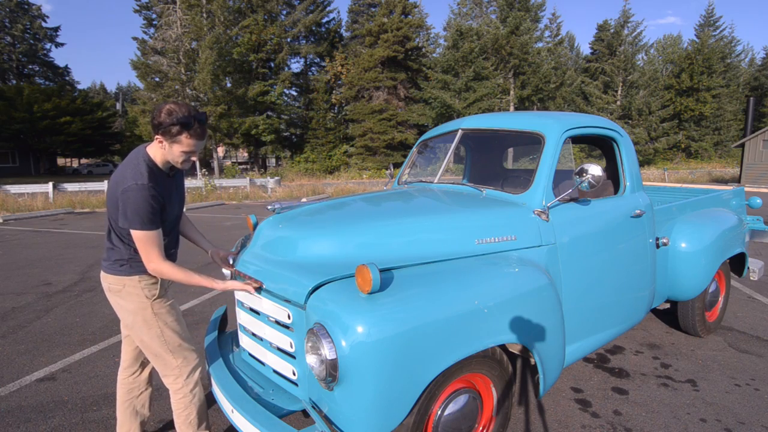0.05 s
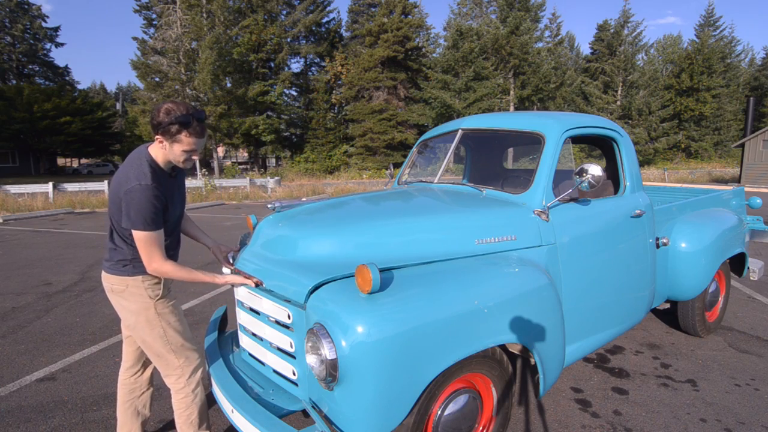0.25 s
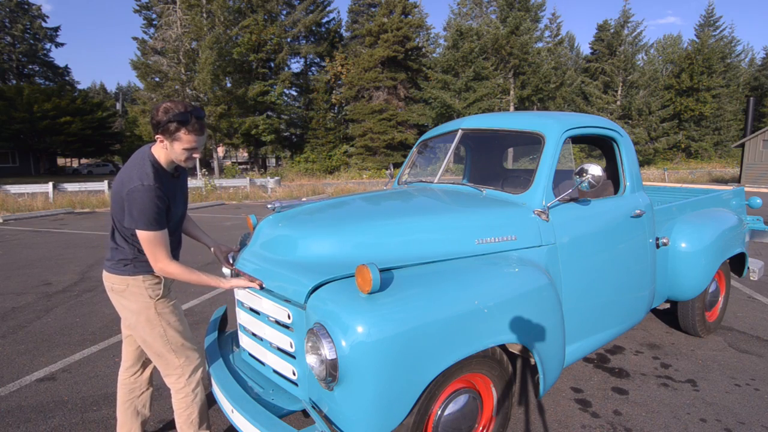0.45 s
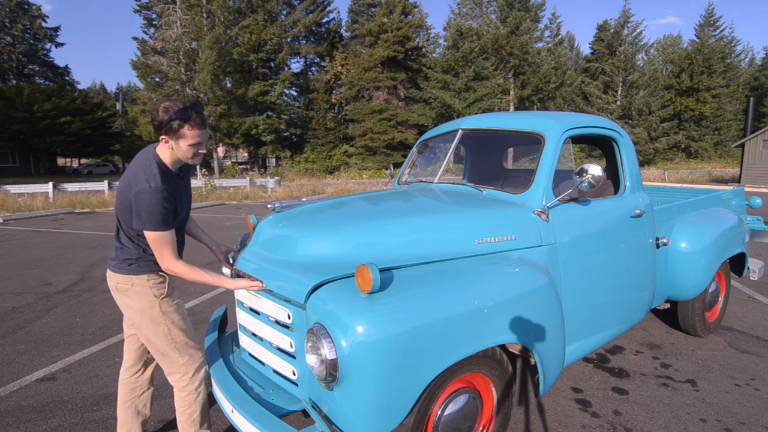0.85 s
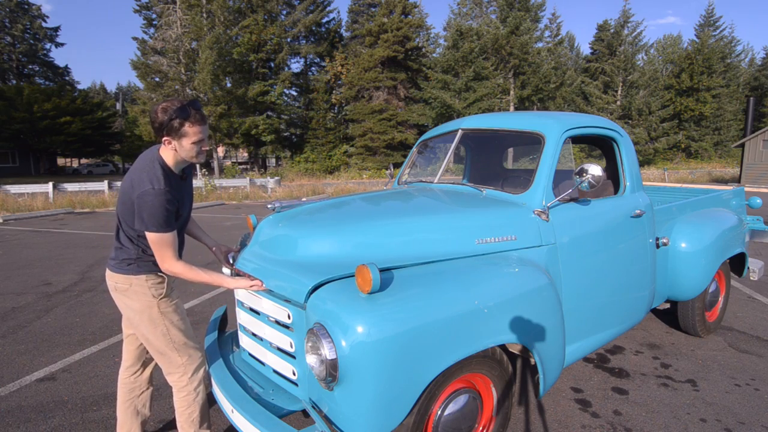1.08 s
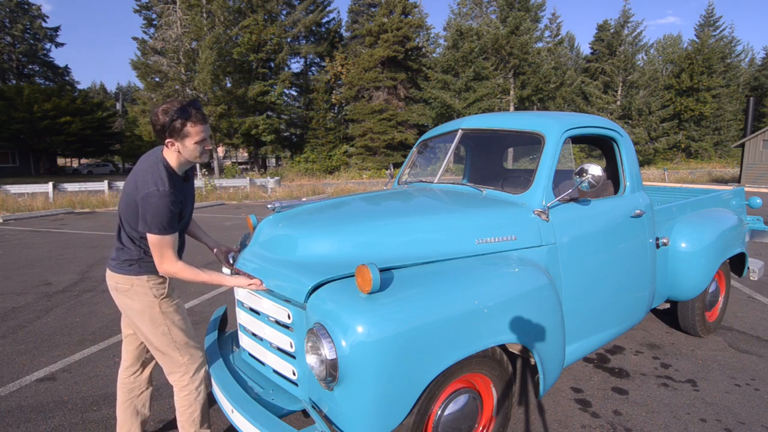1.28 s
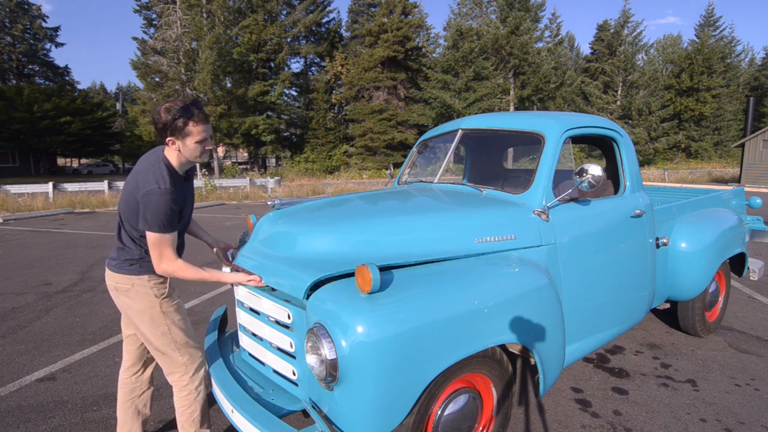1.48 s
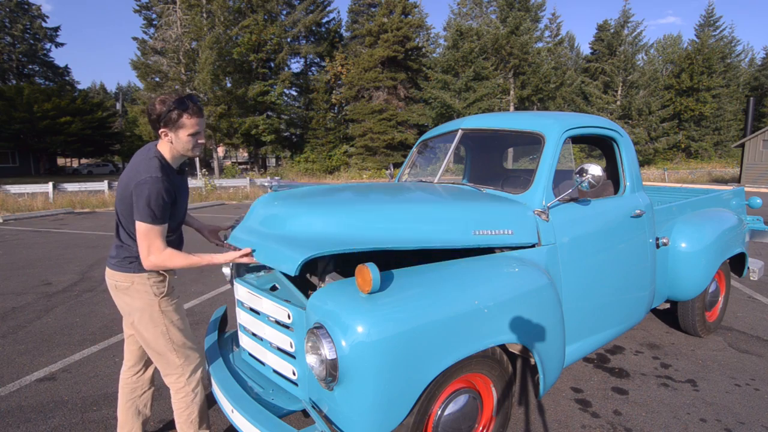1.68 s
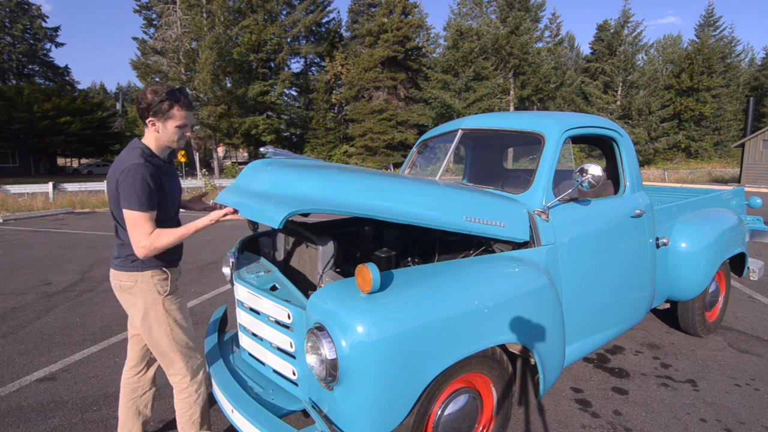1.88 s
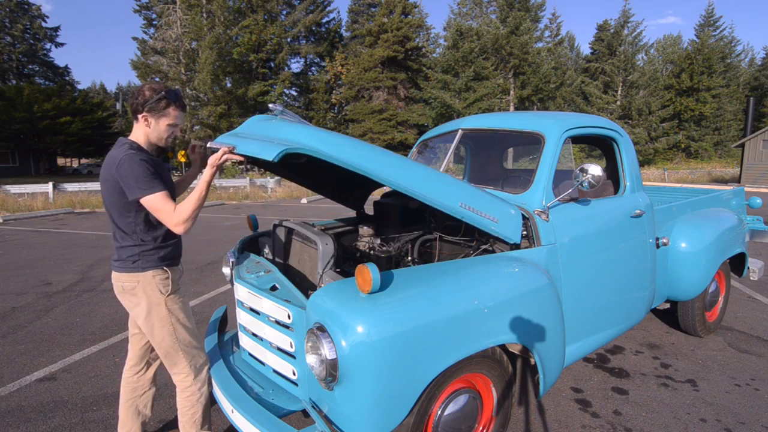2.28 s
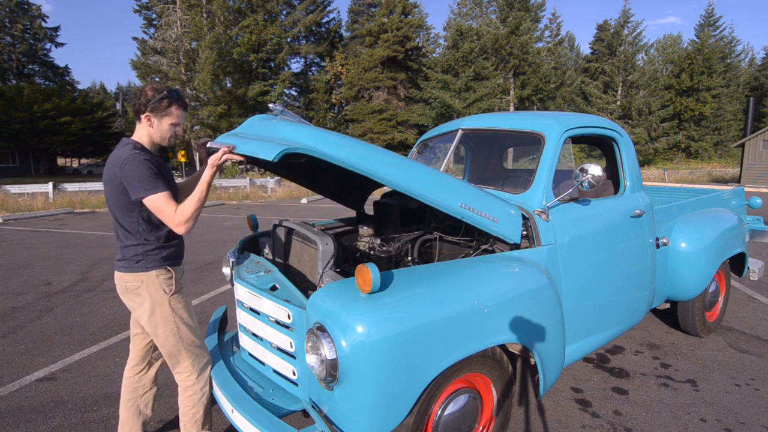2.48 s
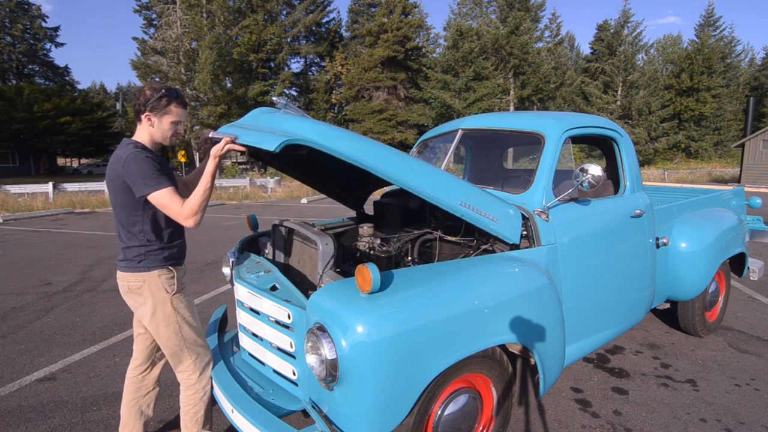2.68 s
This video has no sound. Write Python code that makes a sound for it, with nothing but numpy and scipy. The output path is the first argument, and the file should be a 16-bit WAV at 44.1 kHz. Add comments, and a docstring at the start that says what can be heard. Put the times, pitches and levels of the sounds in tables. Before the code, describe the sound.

A metal truck hood pops with a clunk and a hollow boom. Its catch clicks, scrapes and slips loose, and the springs clank as it lifts, ending on a squeak. Heard up close over faint outdoor rumble and sleeve rustle.

```python
"""The steel hood of an old pickup is opened by hand in a quiet parking lot.
The latch lets go with a clunk and the freed panel booms. The safety catch snaps, squeaks and slips
free, then the hinge springs clank as the hood rises. Each hit layers a crack, the part's own ring
and the wash of the panels; rubbing metal scrapes and sings. Sleeves rustle over a low outdoor rumble."""
import sys
import numpy as np
from scipy import signal
from scipy.fft import rfft, irfft, next_fast_len
from scipy.io import wavfile
from scipy.ndimage import uniform_filter1d

SR = 44100
rng = np.random.default_rng(int(sys.argv[2]) if len(sys.argv) > 2 else 0)


def unload_audio(sound):
    """Save the sound as a 16-bit wav file, at the path given as the first command line argument."""
    columns = np.transpose(np.atleast_2d(sound))
    # keep every value between -1 and 1, then stretch to whole-number steps
    steps = np.round(np.clip(columns, -1, 1) * 32767)
    wavfile.write(sys.argv[1], SR, steps.astype(np.int16))


N = 125685
T = np.arange(N) / SR
BAND_HZ = 25 * 2 ** (np.arange(29) / 3)
COLOUR_HZ = (200, 750, 2200, 8000)  # bass, mids, presence and treble of a hit
TOP_HZ, CUTOFF_HZ = 14000, 16000
CRACK_DB, CRACK_T60_S = 5, 0.041
BUILD_CYCLES = 2.24  # a panel needs a few cycles to get going, so the lows come later

# Outdoor rumble bed: f/Hz, band level/dB
AIR_SPECTRUM = [(38, -56.5), (62, -49.5), (85, -73.5), (125, -59.5), (160, -66), (230, -60.5), (500, -63.5),
                (900, -62), (1600, -73.5), (3200, -83), (8000, -83)]
# Tone of the cloth: f/Hz, band level/dB
CLOTH_SPECTRUM = [(3000, 1), (5500, 7.5), (10000, 4.5), (15000, -1.5)]
# Sleeve moves: t/s, length/s, level/dB
RUSTLES = [(.105, 0.084, -55.5), (.40, 0.21, -60), (.52, 0.18, -54), (1.40, 0.25, -59), (1.66, 0.49, -63.5)]
# Metal rubbing on metal: t/s, length/s, drive level/dB
SCRAPES = [(.645, 0.083, -52.5), (1.48, 0.11, -43), (1.80, 0.39, -54), (2.765, 0.11, -44)]
# Resonances the rubbing drives: f/Hz, width/Hz, gain/dB
SCRAPE_RINGS = [(615, 290, -16), (995, 300, -9.5), (2000, 200, -27.5)]
# Squeaks of catch and pivots: t/s, length/s, f/Hz, level/dB
SQUEAKS = [(1.499, 0.032, 1120, -40.5), (1.512, .036, 1020, -38), (1.501, 0.065, 2740, -50),
           (1.918, 0.029, 2700, -54), (2.814, 0.093, 890, -39)]
# Low thumps of the flexing hood: t/s, f/Hz, level/dB, rise/s, t60/s
FLEXES = [(.264, 121, -24, 0.0084, 0.1), (.286, 192, -19, 0.0066, .021), (0.25, 54, -34, 0.03, 0.61),
          (0.3, 100, -27.5, 0.027, .2), (.335, 68, -31.5, 0.028, 0.28)]

# Hits on each part: t/s, then level/dB at each of COLOUR_HZ
HINGE_TAPS = [(2.4267, -55.5, -40, -45, -55.5)]
SPRING_CLANKS = [(2.2522, -60, -39.5, -34.5, -47.5), (2.4934, -34.5, -29.5, -24, -35)]
RELEASE_CLUNKS = [(0.183, -43, -39.5, -47, -45), (.239, -35.5, -37, -37.5, -52),
                  (.263, -28.5, -31, -60, -39.5), (.270, -36, -28, -35, -39.5),
                  (.287, -32, -30, -34.5, -34), (.422, -46.5, -45, -53.5, -62)]
CATCH_SNAPS = [(1.2801, -40, -33, -30, -50.5)]
CATCH_SLIPS = [(1.605, -37.5, -29, -45.5, -51.5), (1.617, -34.5, -35.5, -42.5, -54.5)]
PIN_TICKS = [(1.025, -70, -47.5, -52.5, -66.5), (1.065, -42.5, -44, -53.5, -58.5),
             (1.6582, -55, -45.5, -43.5, -39.5)]
HOOD_KNOCKS = [(1.826, -40, -38, -48, -53.5), (1.856, -53, -46, -54, -55.5), (1.907, -37, -36, -52, -65),
               (2.027, -70, -59, -57.5, -61), (2.6742, -37, -66, -93, -53.5)]

# Ring of each part: f/Hz, level/dB relative to the hit
HINGE_MODES = [(545, 8.5), (915, 6.5), (2120, -1)]
SPRING_MODES = [(468, -6.5), (899, -11), (1302, -7.5), (1653, -9.5), (1782, -5), (2444, -10), (4947, -13),
                (6718, -2)]
HOOD_MODES = [(191, -10), (220, -9.5), (289, -13.5), (345, -18), (428, -9.5), (620, -16), (683, -30),
              (1018, -17)]
CATCH_MODES = [(818, -2.5), (1130, -1.5), (1432, -6.5), (1610, -4.5), (2186, -7.5), (2369, -14), (3020, -8)]
STRIKER_MODES = [(218, 0), (345, -17), (813, 3.5), (1035, -2.5)]
PIN_MODES = [(3780, 1.4), (5330, 3.5), (7600, 4.1), (11370, 1.47)]
HOOD_EDGE_MODES = [(340, -5.5), (392, -2), (560, -6)]

# Wash of many weak panel modes: f/Hz, band level/dB relative to the hit
PANEL_SPECTRUM = [(110, -16.5), (150, -10.5), (220, -9.5), (500, -6), (1000, -7), (2300, -8), (3400, -11),
                  (5000, -5), (8000, -7.5), (11000, -11.5), (15000, -26)]
# Decay of the wash, before each part's ring_scale: f/Hz, t60/s
PANEL_T60 = [(100, 0.16), (300, 0.3), (800, 0.29), (2200, 0.26), (6000, 0.083), (14000, 0.078)]
# Faint tail behind a hit: f/Hz, t60/s
TAIL_T60 = [(150, 2.8), (700, 1.17), (2000, 0.37), (5000, 0.1), (12000, 0.21)]
# Stereo image, tight lows and wide highs: f/Hz, left-right correlation
CORRELATION = [(30, 0.95), (110, 1), (800, 0.98), (2200, .82), (4000, 0.04), (10000, 0.19)]
# Stereo lean: f/Hz, left minus right level/dB
BALANCE = [(1000, 0), (2500, -1), (4500, -4), (8000, -0.5), (13000, 2.5)]


def from_db(db):
    """Decibels to gain."""
    return 10 ** (np.asarray(db) / 20)


def at_hz(points, hz):
    """Read a curve on a log-frequency axis."""
    freqs, values = np.transpose(points)
    return np.interp(np.log(hz), np.log(freqs), values)


def pan(hz):
    """Left and right gains at a frequency."""
    return from_db(at_hz(BALANCE, hz) * np.array([[.5], [-.5]]))


def decay(t, t60):
    """Exponential fade, 60 dB down at t60."""
    return np.exp(-np.log(1000) * t / max(t60, 1e-3))


def swells(rows):
    """A rounded envelope for each stroke."""
    return sum(from_db(db) * np.sin(np.pi * np.clip((T - start) / length, 0, 1)) ** 2
               for start, length, db in rows)


def noise_bands(ripple_db, mode_spacing_hz=35.42):
    """Steady third-octave bands of stereo noise; ripple favours some pitches, as steel does."""
    size, bands = next_fast_len(N + SR // 2), []
    freqs = np.arange(size // 2 + 1) * SR / size
    knots = np.arange(SR // 20) * mode_spacing_hz
    peaks = np.clip(rng.standard_normal(len(knots)), -2, 2)
    ripple = ripple_db * np.interp(freqs, knots, peaks) * freqs / (freqs + COLOUR_HZ[1])
    noise = irfft(rfft(rng.standard_normal((2, 2, size))) * from_db(ripple), size)
    for k, hz in enumerate(BAND_HZ):
        bandpass = signal.butter(2, [hz / 1.13, hz * 1.13], "band", fs=SR, output="sos")
        pair = signal.sosfilt(bandpass, noise[k % 2])[:, -N:]
        power = uniform_filter1d(pair ** 2, size=int(SR * max(9 / hz, .012)))
        mid, side = pair / np.sqrt(power + 1e-18)
        alike = np.clip(at_hz(CORRELATION, hz), 0, .999)
        stereo = np.sqrt((1 + alike) / 2) * mid + np.sqrt((1 - alike) / 2) * side * [[1], [-1]]
        bands.append(pan(hz) * stereo)
    return np.array(bands)


def coloured(bands, spectrum):
    """Mix the bands through an EQ curve."""
    return np.tensordot(from_db(at_hz(spectrum, BAND_HZ)), bands, 1)


def outdoor_rumble(bands):
    """Open air lays a steady, bass-heavy bed."""
    return coloured(bands, AIR_SPECTRUM)


def sleeves(bands):
    """Moving cloth brushes out soft swells of hiss."""
    cloth = coloured(bands, CLOTH_SPECTRUM)
    return swells(RUSTLES) * cloth / cloth.std()


def scrapes(bands, slips_per_s=710, slip_t60=0.016):
    """Dry metal slips in tiny uneven jerks, a grit that rings a few resonances."""
    slips = (rng.random(N) < slips_per_s / SR) * rng.random(N)
    grain = np.sqrt(signal.lfilter([1], [1, -decay(2 / SR, slip_t60)], slips + 1e-18))
    hiss = bands[BAND_HZ > COLOUR_HZ[0]].sum(0)
    friction = hiss * grain / grain.std() * swells(SCRAPES) + 1e-18
    return sum(from_db(db) * signal.lfilter(*signal.iirpeak(hz, hz / width, fs=SR), friction)
               for hz, width, db in SCRAPE_RINGS)


def squeaks(jitter_hz_at_1k=84.9):
    """Sticking metal sings briefly on one mode, unsteady in pitch."""
    out, knots = 0, np.arange(0, T[-1], .003)
    for start, length, hz, db in SQUEAKS:
        wobble = np.interp(T, knots, rng.standard_normal(len(knots)))
        pitch = hz + jitter_hz_at_1k * np.sqrt(hz / 1000) * wobble
        out = out + pan(hz) * swells([(start, length, db)]) * np.sin(2 * np.pi * np.cumsum(pitch) / SR)
    return out


def waver(t, depth_hz=4.26):
    """Flexing steel bends a mode a little: a slow random phase drift, in cycles."""
    return np.cumsum(depth_hz * np.interp(t * 20, np.arange(32), rng.standard_normal(32))) / SR


def struck(bands, hits, modes, t60_at_1k, ring_scale, tail_db, rise_s, top_db):
    """Struck steel: crack, panel wash, tail and the part's modes; top_db tilts treble to TOP_HZ."""
    out = np.zeros((2, N))
    t = T[:SR * 3 // 2]

    def attack(hz):
        """Rise of the ring, slower for low pitches."""
        return np.minimum(t / (rise_s + min(BUILD_CYCLES / hz, .012)), 1)

    crack = from_db(CRACK_DB) * decay(t, CRACK_T60_S)
    envelopes = []
    for hz in BAND_HZ:
        wash = decay(t, ring_scale * at_hz(PANEL_T60, hz))
        tail = from_db(tail_db) * decay(t, at_hz(TAIL_T60, hz))
        fade = np.sqrt(wash ** 2 + tail ** 2 + crack ** 2)
        envelopes.append(from_db(at_hz(PANEL_SPECTRUM, hz)) * attack(hz) * fade)
    phases = rng.random(len(modes))  # shared, so a new hit adds to the ring already there
    for start, *levels in hits:
        colour = [*zip(COLOUR_HZ, levels), (TOP_HZ, levels[-1] + top_db)]
        offset = rng.integers(N - len(t))
        hit = sum(from_db(at_hz(colour, hz)) * envelope * band[:, offset:offset + len(t)]
                  for hz, envelope, band in zip(BAND_HZ, envelopes, bands))
        for (hz, db), phase in zip(modes, phases):
            t60 = t60_at_1k * (1000 / hz) ** .4  # high modes die sooner
            stereo_angle = np.arccos(np.clip(at_hz(CORRELATION, hz), 0, 1))
            spread = stereo_angle * np.array([[.5], [-.5]]) * rng.choice([-1, 1])
            tone = np.sin(2 * np.pi * (hz * (start + t) + phase + waver(t)) + spread)
            hit += pan(hz) * from_db(db + at_hz(colour, hz)) * attack(hz) * decay(t, t60) * tone
        onset = int(start * SR)
        out[:, onset:onset + len(t)] += hit[:, :N - onset]
    return out


def hinges(bands):
    """The linkage taps and the springs jump in their seats."""
    taps = struck(bands, HINGE_TAPS, HINGE_MODES,
                  t60_at_1k=0.16, ring_scale=1.0, tail_db=-3.5, rise_s=0.00085, top_db=1)
    clanks = struck(bands, SPRING_CLANKS, SPRING_MODES,
                    t60_at_1k=0.23, ring_scale=0.84, tail_db=-11, rise_s=0.0057, top_db=-0.5)
    return taps + clanks


def latch(bands):
    """The release clunks through the hood; the safety catch snaps and slips, and its pin ticks."""
    clunks = struck(bands, RELEASE_CLUNKS, HOOD_MODES,
                    t60_at_1k=0.77, ring_scale=1.28, tail_db=-7, rise_s=0.00049, top_db=-4)
    snaps = struck(bands, CATCH_SNAPS, CATCH_MODES,
                   t60_at_1k=0.22, ring_scale=0.79, tail_db=-10, rise_s=0.0011, top_db=-39)
    slips = struck(bands, CATCH_SLIPS, STRIKER_MODES,
                   t60_at_1k=0.15, ring_scale=0.97, tail_db=-9, rise_s=0.00029, top_db=18.5)
    ticks = struck(bands, PIN_TICKS, PIN_MODES,
                   t60_at_1k=0.082, ring_scale=0.71, tail_db=-6.5, rise_s=0.00046, top_db=3)
    return clunks + snaps + slips + ticks


def hood(bands):
    """The big panel booms as it springs up and knocks lightly while handled."""
    out = struck(bands, HOOD_KNOCKS, HOOD_EDGE_MODES,
                 t60_at_1k=0.31, ring_scale=0.91, tail_db=-14.5, rise_s=0.00076, top_db=3)
    for start, hz, db, rise, t60 in FLEXES:
        t = np.maximum(T - start, 0)
        envelope = np.minimum(t / rise, 1) * decay(np.maximum(t - rise, 0), t60)
        out += from_db(db) * envelope * np.sin(2 * np.pi * hz * t)
    return out


def scene():
    """The truck's steel up front, sleeves and open air behind."""
    metal, air = noise_bands(ripple_db=3), noise_bands(ripple_db=0)
    truck = latch(metal) + hinges(metal) + hood(metal) + scrapes(metal) + squeaks()
    return truck + sleeves(air[..., ::-1]) + outdoor_rumble(air)  # reversed noise keeps the two distinct


def record(dry):
    """A steep low-pass trims the very top of the mix."""
    return signal.sosfilt(signal.ellip(10, .2, 70, CUTOFF_HZ, fs=SR, output="sos"), dry)


dry = scene()
out = record(dry)
unload_audio(out)
```